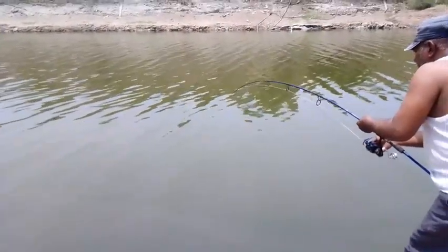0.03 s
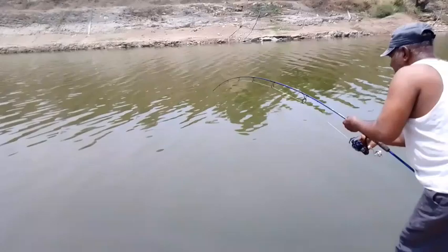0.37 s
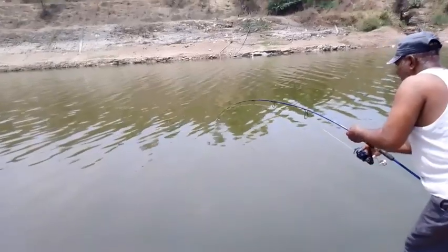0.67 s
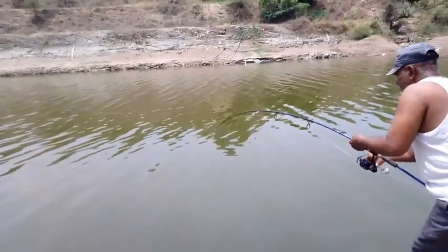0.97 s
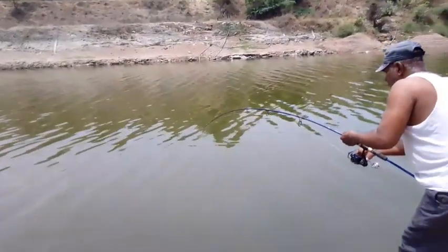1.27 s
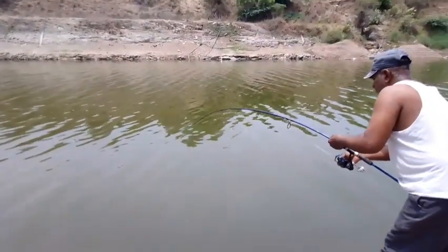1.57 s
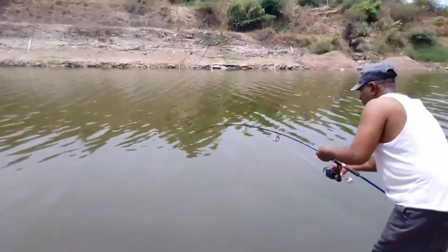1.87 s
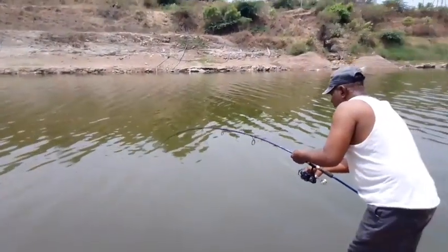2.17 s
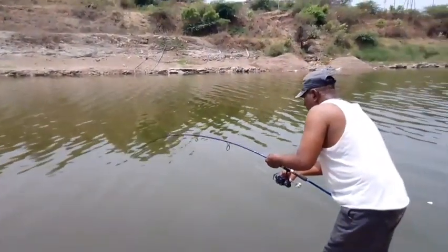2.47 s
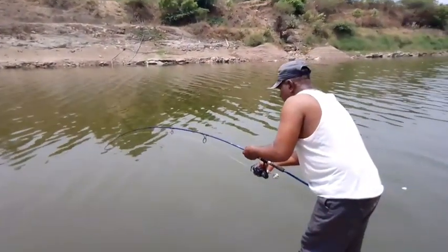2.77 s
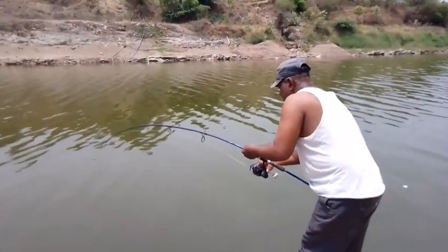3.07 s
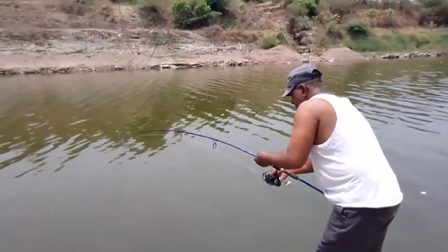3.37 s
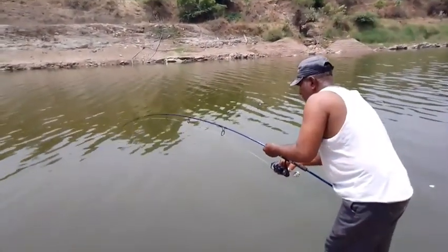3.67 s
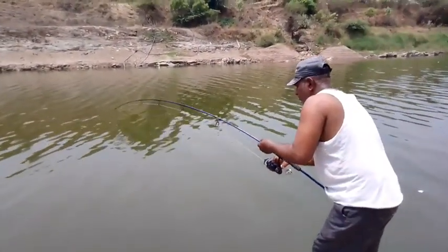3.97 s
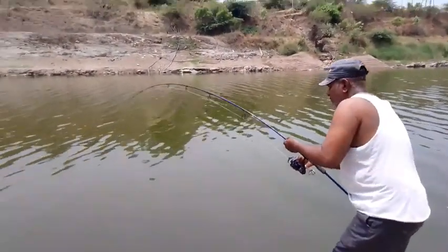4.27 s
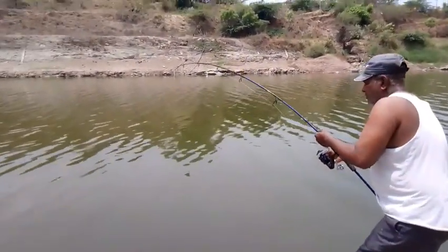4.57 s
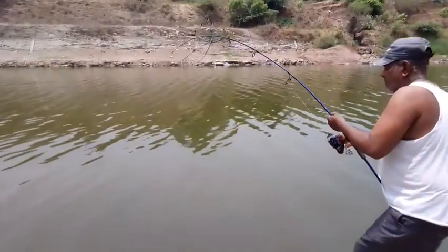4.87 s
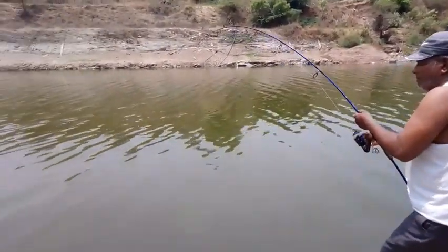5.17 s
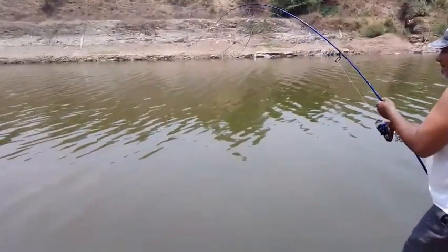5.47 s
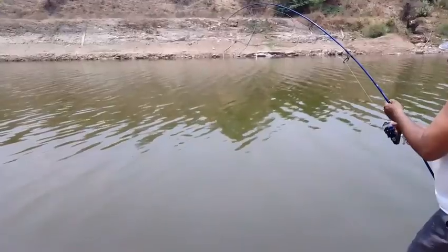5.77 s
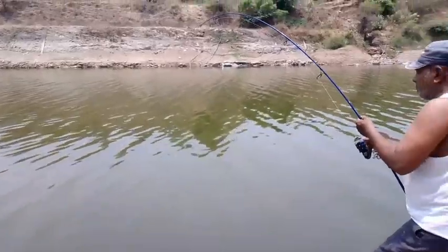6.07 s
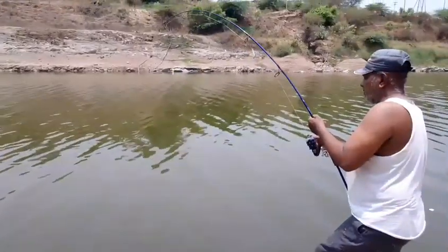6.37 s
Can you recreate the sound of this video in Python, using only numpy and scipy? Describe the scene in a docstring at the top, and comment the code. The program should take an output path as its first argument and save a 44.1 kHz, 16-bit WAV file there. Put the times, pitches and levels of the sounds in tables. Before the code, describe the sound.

A bird whistles upward in the open air by a pond. Then a reel drag, right by the microphone, ratchets twice with a bright metallic ring, speeding up and slowing as a fish takes line. After the second run only the background remains: a few more thin whistles and high chirps, a light rumbling breeze and an engine humming faintly far away.

```python
"""A spinning reel close to the microphone, beside a pond: a hooked fish takes line in two short runs.
The drag's pawl clicks over its teeth and sets the metal spool ringing like a small bell.
Around the pond one bird gives rising whistles, another buzzy chirps.
Far off an engine, perhaps a pump, hums under light air. Heard in mono."""
import sys
import numpy as np
from scipy import signal
from scipy.fft import rfft, irfft
from scipy.io import wavfile
from scipy.ndimage import uniform_filter1d

SR = 44100
rng = np.random.default_rng(int(sys.argv[2]) if len(sys.argv) > 2 else 0)


def unload_wav(signal):
    """Save mono or channel-first audio to the path in sys.argv[1] as 16-bit WAV at rate SR, clipped to [-1, 1]."""
    wavfile.write(
        sys.argv[1],
        SR,
        np.round(np.clip(np.atleast_2d(signal).T, -1, 1) * 32767).astype(np.int16),
    )


N = 283563
TIME = np.arange(N) / SR

# the drag's speed in each run of the fish: t/s, rate/(clicks per s)
FIRST_RUN = [(0.652, 58.4), (0.71, 101.9), (0.8, 42.7), (0.87, 38.4), (0.96, 78.9), (1.02, 80.8),
             (1.09, 42.3), (1.17, 44.8), (1.28, 53.3), (1.36, 27.6), (1.51, 29.5)]
SECOND_RUN = [(1.851, 61.7), (1.9, 107.4), (1.99, 102.2), (2.07, 50.3), (2.19, 85.8), (2.23, 69.2),
              (2.35, 87.2), (2.48, 75.0), (2.56, 60.5), (2.66, 76.9), (2.71, 63.2), (2.77, 38.5),
              (2.87, 45.9), (3.0, 28.9)]


def gain_of(db):
    """Decibels to a factor."""
    return 10 ** (np.asarray(db) / 20)


def unit_rms(x):
    """Scales to rms 1."""
    return x / np.sqrt(np.mean(x ** 2) + 1e-20)


def drift(hz, size=N):
    """Random wander of rms about 1, no faster than about hz."""
    f = np.fft.rfftfreq(N, 1 / SR)
    return unit_rms(irfft(rfft(rng.standard_normal(N)) * np.exp(-(f / hz) ** 2), N))[:size]


def add(mix, s, sound):
    """Lays a sound into the mix at time s."""
    part = mix[max(round(s * SR), 0):][:len(sound)]
    part += sound[:len(part)]


def air(level_db=-52.0, patchy_db=1.32, ripple_db=1.35, gust_db=1.5, gust_hz=100):
    """Distant outdoor wash in drifting patches, with a breeze that stirs the lowest rumble."""
    # spectrum of the open air: f/Hz, relative level/dB
    spectrum = [(15, 0), (45, -7.5), (80, -6), (120, -14), (220, -12), (350, -19), (520, -17), (660, -11.5),
                (860, -21.5), (1020, -13), (1330, -21.5), (1950, -16), (2900, -24.5), (3550, -25.5),
                (4200, -28.5), (4700, -28.5), (5600, -34), (6100, -42), (7800, -43.5), (12000, -64)]
    frames, hz = N // 1024 + 5, np.fft.rfftfreq(4096, 1 / SR)
    real, imag, patches = np.moveaxis(rng.standard_normal((frames, len(hz), 3)), 2, 0)
    patches = unit_rms(uniform_filter1d(uniform_filter1d(patches, size=5, axis=0), size=32, axis=1))
    low = 1 / (1 + (hz / gust_hz) ** 2)
    gusts = unit_rms(uniform_filter1d(rng.standard_normal(frames), size=7))[:, None] * low
    # long paths comb the spectrum
    ripple = unit_rms(uniform_filter1d(rng.standard_normal(len(hz)), size=2)) * (1 - low)
    f, db = np.transpose(spectrum)
    steady_db = np.interp(np.log(hz + 1), np.log(f), db)
    field_db = steady_db + patchy_db * patches + gust_db * gusts + ripple_db * ripple
    _, wash = signal.istft(((real + 1j * imag) * gain_of(field_db)).T, nperseg=4096, noverlap=3072)
    return gain_of(level_db) * unit_rms(wash[:N])


def far_engine(waver=0.001313, fade=0.4, fade_hz=6):
    """Tones that share one wandering speed; each fades by itself on its way to the microphone."""
    # tones of the hum: f/Hz, level/dB
    tones = [(48.2, -59), (145.2, -72.5), (386.7, -69), (598.5, -68), (663.5, -68), (711, -69), (760, -77),
             (775, -70.5), (901, -76.5), (947.8, -63), (999.5, -68), (1057, -70.5), (1201, -70),
             (1234, -76), (1351, -78.5), (1511, -78), (1643, -72), (1860, -75), (1903, -77), (1935, -69),
             (2192, -71), (2332, -81.5)]
    clock = np.cumsum(1 + waver * drift(1.44)) / SR
    knots = np.arange(0, TIME[-1] + 1, 1 / (2 * fade_hz))
    hum = np.zeros(N)
    for hz, db in tones:
        fade_sin, fade_cos = (np.interp(TIME, knots, fade * rng.standard_normal(len(knots)))
                              for _ in range(2))
        angle = 2 * np.pi * (hz * clock + rng.random())
        hum += gain_of(db) * ((1 + fade_sin) * np.sin(angle) + fade_cos * np.cos(angle))
    return np.sqrt(2) * hum


def sing(hz, level_db, flutter_db=2.0, waver=0.0038):
    """A bird's nearly pure tone, a little unsteady, with soft ends."""
    turns = np.cumsum(hz * (1 + waver * drift(200, size=len(hz)))) / SR
    level = gain_of(level_db + flutter_db * drift(110, size=len(hz)))
    return np.sqrt(2) * level * signal.windows.tukey(len(hz), .06) * np.sin(2 * np.pi * turns)


def whistling_bird(climb_s=.195, break_hz=4820, swell_db=6.5,
                   rise_s=.024, fall_s=.042, sag_hz=750, fade_db=-9):
    """Each whistle swells and climbs ever faster until the voice breaks, then jumps to a short arch."""
    # whistles: t of the top/s, starting f/Hz, top f/Hz, peak climb level/dB, peak arch level/dB
    calls = [(0.222, 3200, 5540, -49, -55.5), (2.12, 3230, 5520, -55.5, -58.5),
             (4.81, 3330, 5200, -54, -54.5)]
    climb = np.linspace(0, 1, int(climb_s * SR))
    arch = (np.arange(-rise_s, fall_s, 1 / SR) / fall_s) ** 2
    song = np.zeros(N)
    for top_s, start_hz, top_hz, climb_db, arch_db in calls:
        hz = np.r_[start_hz + (break_hz - start_hz) * climb ** 2.5, top_hz - sag_hz * arch]
        db = np.r_[climb_db + swell_db * (climb - 1), arch_db + fade_db * arch]
        add(song, top_s - rise_s - climb_s, sing(hz, db))
    return song


def pond_banks(x, t60, echo_db):
    """The direct sound plus faint scatter from the ground and the banks."""
    t = np.arange(SR // 2) / SR
    taps = rng.standard_normal(len(t)) * (rng.random(len(t)) < .05)
    taps *= gain_of(-60 * t / t60) * (t > .004)
    return x + gain_of(echo_db) * signal.fftconvolve(x, taps / np.linalg.norm(taps))[:N]


def pawl(scatter_db=2.2, snap_s=0.0014, rise_s=0.0006, bounce_s=0.00344, bounce_db=-9,
         tail_s=0.0017, tail_db=-22, rub_db=-43, chatter_db=-32, chatter_rate=100):
    """Contact strength: the pawl snaps off each tooth, bounces, settles, and chatters at speed."""
    blows, chatter = np.zeros((2, N))
    for run in (FIRST_RUN, SECOND_RUN):
        rate = np.interp(TIME, *np.transpose(run), left=0, right=0)
        teeth = np.cumsum(rate) / SR + .55  # the pawl starts mid-tooth
        clicks = np.flatnonzero(np.diff(np.floor(teeth)))
        size, lag = rng.standard_normal((len(clicks), 2)).T
        bounces = clicks + (bounce_s * SR * np.exp(.2 * lag)).astype(int)
        blows[clicks] += gain_of(scatter_db * size)
        blows[bounces] += gain_of(bounce_db + scatter_db * size)
        speed = rate / chatter_rate
        rub = gain_of(rub_db) * np.sqrt(speed)  # between teeth
        chatter += gain_of(chatter_db) * speed ** 5.9 + rub
    t = np.arange(SR // 20) / SR
    snap = (np.exp(-t / snap_s) + gain_of(tail_db) * np.exp(-t / tail_s)) * (1 - np.exp(-t / rise_s))
    return signal.oaconvolve(blows, snap / np.linalg.norm(snap))[:N] + chatter


def grit(contact):
    """Rough metal on metal: random force scaled by the strength of contact."""
    return contact * rng.standard_normal(N)


def mode(x, hz, t60):
    """One decaying resonance, driven by x."""
    r = np.exp(-np.log(1000) / (t60 * SR))
    angle = 2 * np.pi * hz / SR
    ring = signal.lfilter([1, 0, -1], [1, -2 * r * np.cos(angle), r * r], x)
    return np.sqrt(1 - r * r) * ring / np.sin(angle)


def reel_body(contact, onset_s=0.0012):
    """Clicks rattle the body; each mode builds up briefly, keeping the valleys between them dark."""
    # modes of the reel: f/Hz, relative level/dB, t60/s
    modes = [(1530, -3.5, 0.016), (1817, -8.5, 0.042), (2184, -7, 0.014), (2560, -7, 0.0061),
             (3237, 0.5, 0.082), (3550, -12, 0.04), (3600, -13, 0.014), (4520, -15.5, 0.037),
             (4740, -10, 0.028), (5430, -23, 0.046), (5910, -11.5, 0.0059), (6700, -17, 0.02),
             (7780, -25.5, 0.017), (8450, -19.5, 0.0048), (9770, -15, 0.0056), (10030, -22.5, 0.31),
             (9700, -28, 0.0038), (11930, -34, 0.0029), (13800, -25, .008), (14450, -26, 0.0097),
             (15000, -11, .012), (15300, -24, 0.018)]
    return sum(gain_of(db) * unit_rms(mode(mode(grit(contact), hz, t60), hz, onset_s))
               for hz, db, t60 in modes)


def spool(contact, tone, hz, hold_db, t60, kick_db, wander_db,
          wander_hz=12, build_s=0.017, fall_s=0.039, stall_db=-8.5, stall_s=0.012):
    """One bell tone of the spool: it holds while line runs out, swells, stalls and rings on."""
    # swells, where clicks fall in step with a tone: t/s, tone, level/dB, build-up/s
    swells = [(0.665, "low", -50, 0.018), (0.765, "low", -46.5, 0.03), (0.745, "high", -61, .03),
              (0.84, "high", -62, 0.033), (0.995, "low", -45, 0.047), (1.08, "high", -64.5, 0.2),
              (1.16, "low", -44.5, 0.036), (1.29, "low", -45.5, 0.022), (1.375, "low", -41, 0.035),
              (1.4, "high", -61, 0.09), (1.487, "low", -51, 0.024), (1.885, "low", -51.5, 0.028),
              (1.94, "high", -57.5, 0.047), (2.01, "low", -47.5, 0.075), (2.14, "low", -45, 0.097),
              (2.305, "low", -40.5, 0.065), (2.361, "low", -40.5, 0.056), (2.51, "high", -57, 0.23),
              (2.64, "high", -61.5, 0.026), (2.649, "low", -42, 0.055), (2.72, "low", -48, 0.024),
              (2.79, "high", -69, 0.045)]
    # stalls, where a click lands against the spool's swing: t/s, tone
    stalls = [(0.703, "low"), (0.885, "high"), (1.045, "low"), (1.217, "low"), (1.327, "low"),
              (1.448, "low"), (2.215, "low"), (2.57, "high"), (2.585, "low"), (2.775, "low")]
    # free ringing after a run's last clicks: t/s, tone, level/dB
    ring_outs = [(1.51, "high", -59), (1.57, "low", -55.5), (3.0, "low", -49), (3.014, "high", -65)]
    held = sum(np.clip(np.minimum(TIME - run[0][0], run[-1][0] + fall_s - TIME) / build_s, 0, 1)
               for run in (FIRST_RUN, SECOND_RUN))
    power = gain_of(hold_db + wander_db * drift(wander_hz)) ** 2
    for s, which, db, rise_s in swells:
        if which == tone:
            width_s = np.where(TIME < s, rise_s, fall_s)
            power += (gain_of(db) * np.exp(-((TIME - s) / width_s) ** 2)) ** 2
    free = sum(gain_of(db - 60 * abs(TIME - s) / t60) * np.clip(1 + (TIME - s) / build_s, 0, 1)
               for s, which, db in ring_outs if which == tone)
    stalled = sum(np.exp(-((TIME - s) / stall_s) ** 2) for s, which in stalls if which == tone)
    level = np.hypot(held * np.sqrt(power) * gain_of(stall_db * stalled), free) + 1e-10
    # each click knocks the phase, the more so the weaker the tone rings
    knocks = np.cumsum(grit(contact) * np.minimum(gain_of(kick_db) / level, 1))
    return np.sqrt(2) * level * np.sin(2 * np.pi * hz * TIME + uniform_filter1d(knocks, size=60))


def reel_drag(body_db=-63.0):
    """The drag at close range: one pawl drives the reel's body and the spool's two bell tones."""
    contact = pawl()
    body = reel_body(contact)
    low = spool(contact, "low", hz=3215, hold_db=-54.5, t60=0.72, kick_db=-57, wander_db=2.4)
    high = spool(contact, "high", hz=5880, hold_db=-70, t60=0.29, kick_db=-72, wander_db=-0.9)
    return gain_of(body_db) * pond_banks(body, t60=0.069, echo_db=-12) + low + high


def chirping_bird(warble_hz=163):
    """Buzzy chirps whose fast warble settles on a high note."""
    # chirps: t/s, level/dB
    calls = [(1.073, -61.5), (3.925, -59), (6.072, -60)]
    # course of one chirp: t from its start/s, centre f/Hz, warble depth/Hz, relative level/dB
    course = [(0, 6200, 600, -5), (.008, 6250, 850, -2), (.018, 6350, 950, 0), (.029, 6400, 480, 0),
              (.036, 6850, 60, 0), (.043, 6750, 0, -2)]
    knots, *columns = np.transpose(course)
    t = np.arange(0, knots[-1], 1 / SR)
    centre, depth, shape_db = (np.interp(t, knots, column) for column in columns)
    hz = centre - depth * np.cos(2 * np.pi * warble_hz * t)
    song = np.zeros(N)
    for start, db in calls:
        add(song, start, sing(hz, db + shape_db))
    return song


def scene():
    """One microphone at the pond's edge: the near reel, the birds and the far background."""
    reel = reel_drag()
    birds = pond_banks(whistling_bird() + chirping_bird(), t60=0.22, echo_db=-12.5)
    return (reel + birds + far_engine() + air())[None]


def record(dry, edge_hz=15850, offset=-.0402):
    """The recorder's band limit; its converter rests slightly below zero."""
    lowpass = signal.firwin(511, edge_hz, window=("kaiser", 9), fs=SR)
    return offset + signal.oaconvolve(dry, lowpass[None], "same")


dry = scene()
out = record(dry)
unload_wav(out)
```